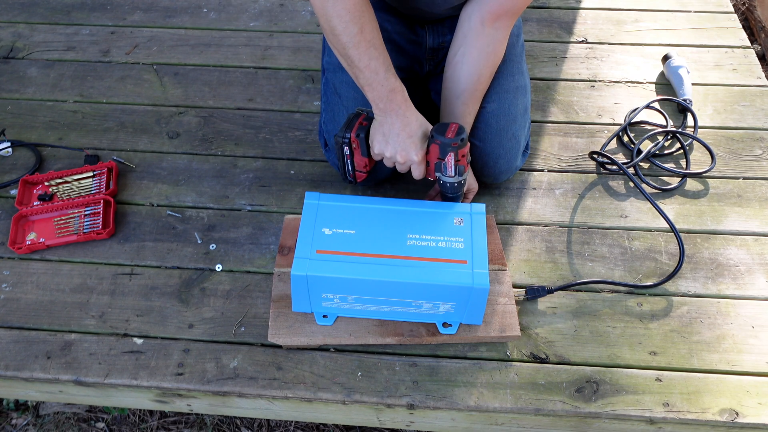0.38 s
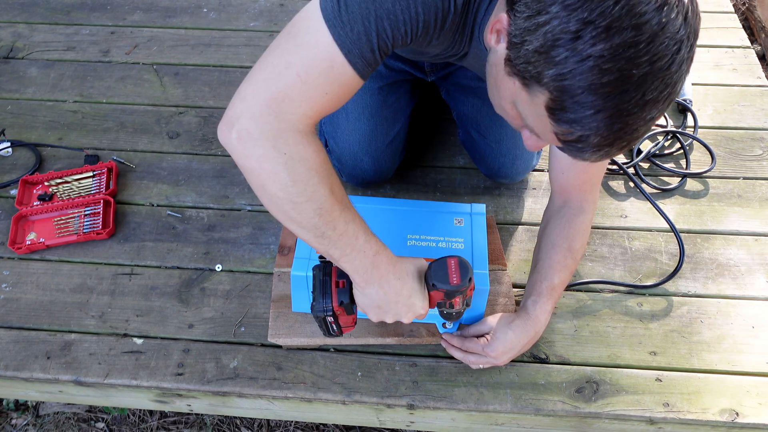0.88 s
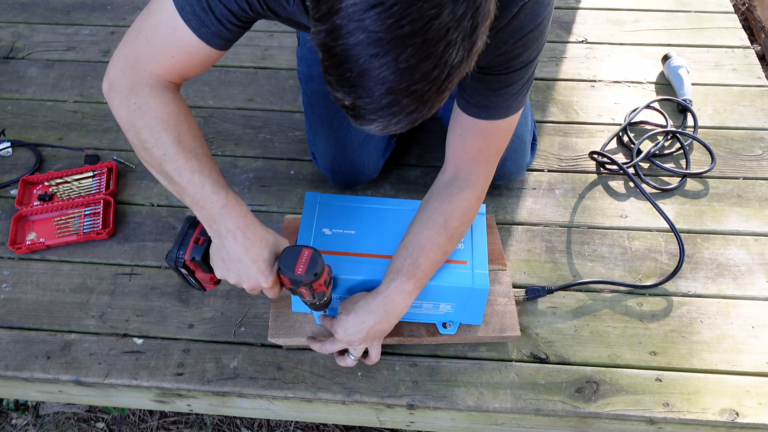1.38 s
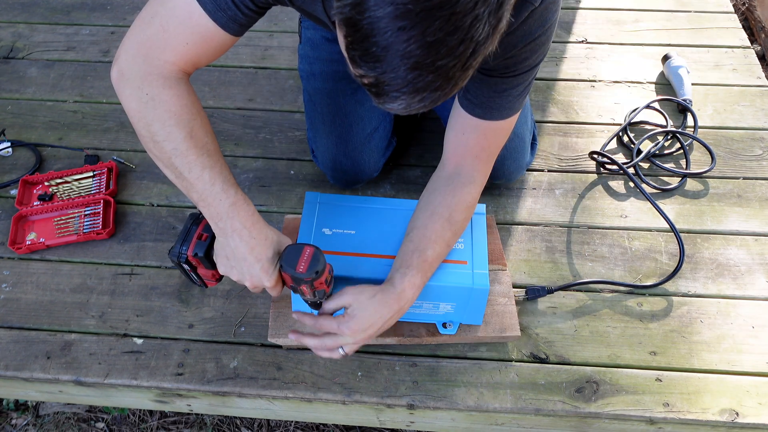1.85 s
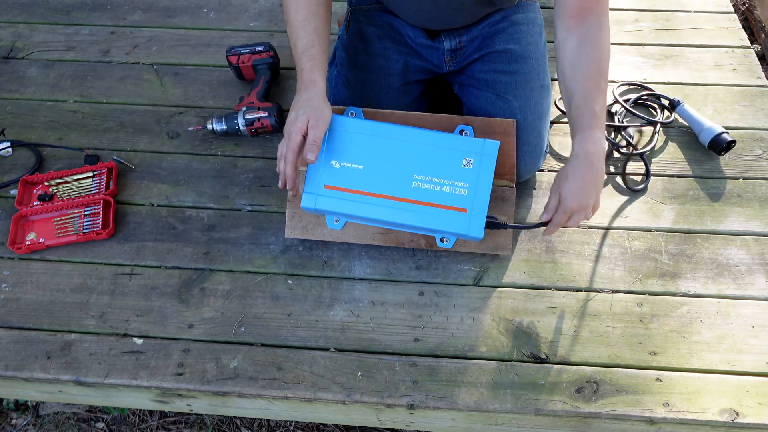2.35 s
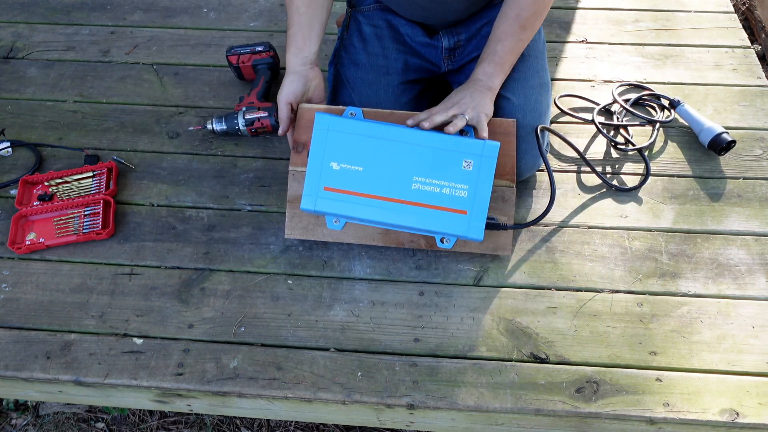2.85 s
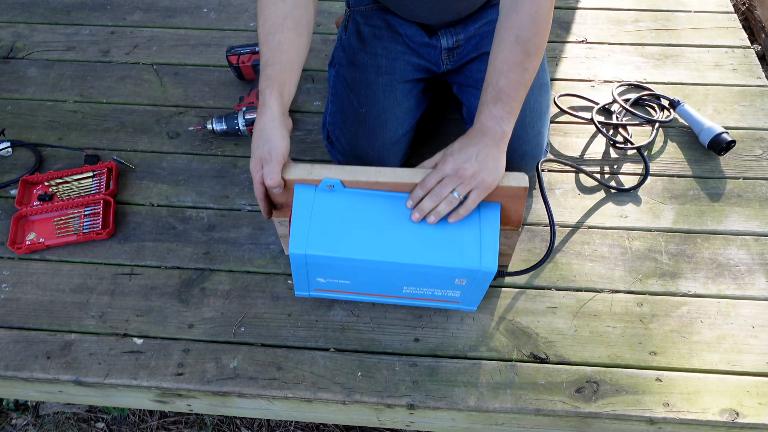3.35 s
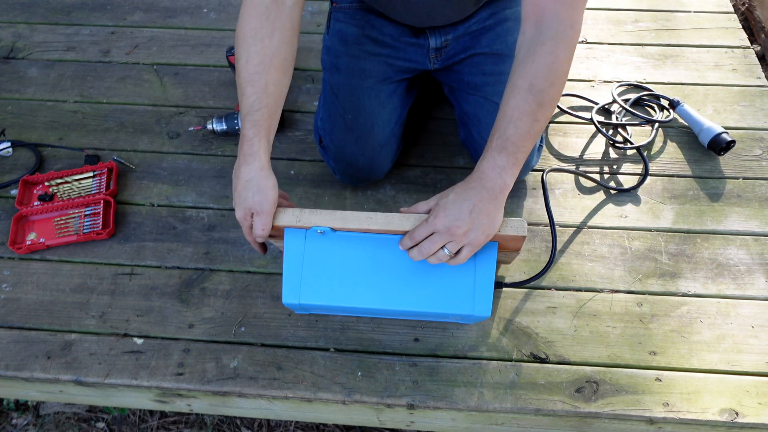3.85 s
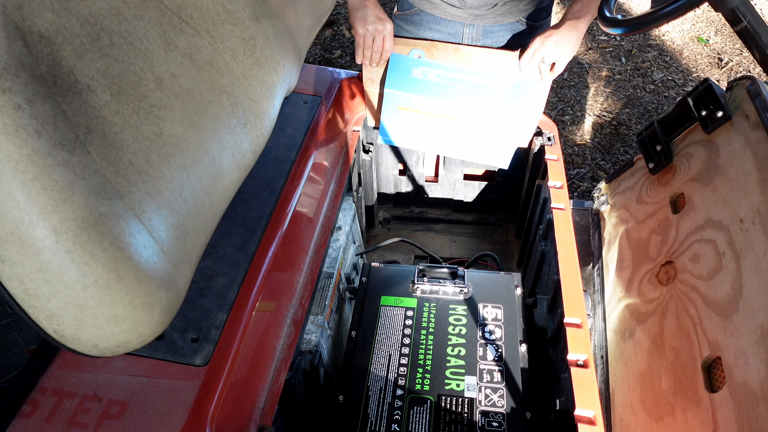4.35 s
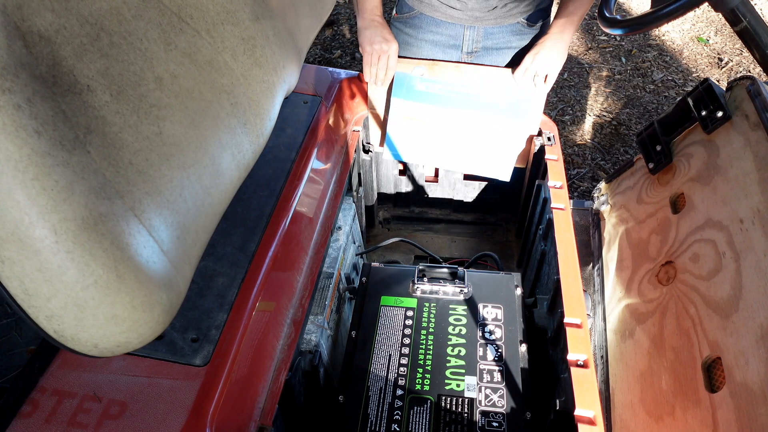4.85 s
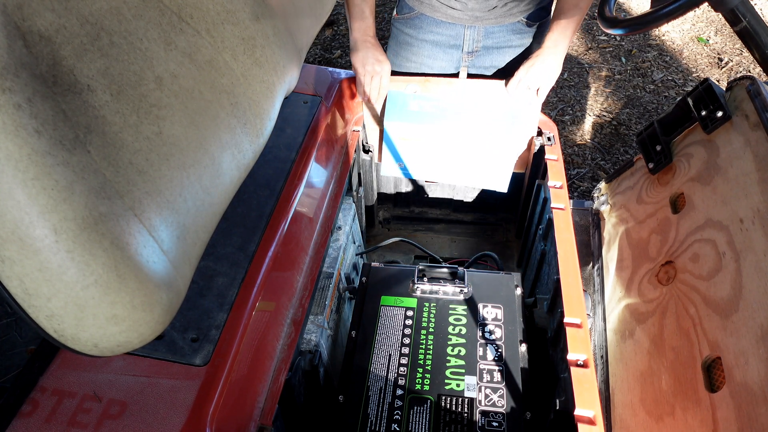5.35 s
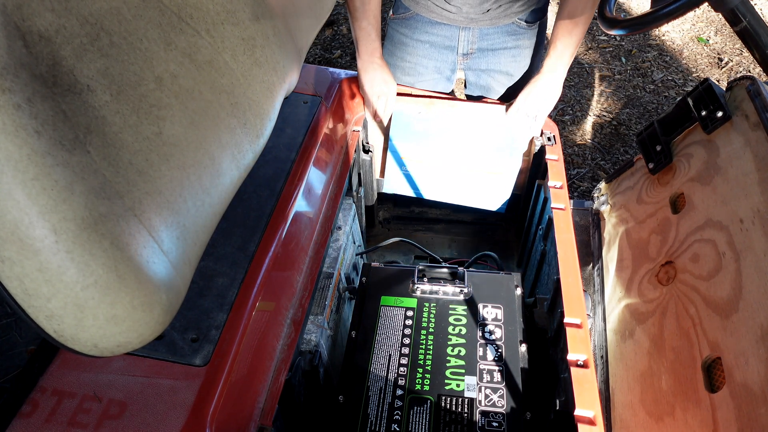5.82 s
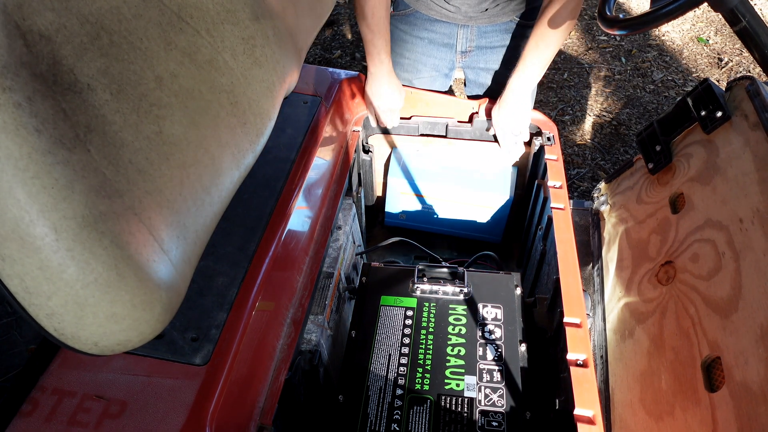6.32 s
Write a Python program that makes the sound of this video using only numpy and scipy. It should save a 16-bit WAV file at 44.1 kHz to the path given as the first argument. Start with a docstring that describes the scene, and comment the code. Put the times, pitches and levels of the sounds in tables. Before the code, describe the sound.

Outdoors on a wooden deck, a cordless drill runs twice back to back, its gear whine climbing each time, then gives two shorter, higher bursts with tiny trigger clicks between. It stops dead; soft knocks, brushing and low plank rumble follow as a board is tipped. Finally the board and case bump and scrape heavily into a hollow bay close to the single microphone, much louder, ending on strong thuds.

```python
"""A cordless drill drives four screws outdoors on a wooden deck, the sound of the first breaking off abruptly,
straight into the second: tones locked to the shaft, gears and switched motor current whine over gear rattle.
Then hands knock, drag and tip a board with a metal case on it, and lower it, bumping and scraping, into a
hollow bay close to the microphone. Blows are damped modes, drags are stick-slip noise through resonances, and
faint coloured noise is the open air."""
import sys
import numpy as np
from scipy import signal
from scipy.fft import rfft, irfft
from scipy.io import wavfile
from scipy.ndimage import uniform_filter1d

SR = 44100
rng = np.random.default_rng(int(sys.argv[2]) if len(sys.argv) > 2 else 0)


def voltage_ratio(level):
    """Linear amplitude factor for a level in decibels (scalar or array-like)."""
    return 10 ** (np.asarray(level, float) / 20)


def dump_mix(stems):
    """Bounce the given channels to the path in sys.argv[1] as a 16-bit WAV at rate SR."""
    frames = np.atleast_2d(stems).T  # one column per channel
    limited = np.clip(frames, -1, 1)  # hard clip at full scale
    pcm = np.round(limited * 32767).astype(np.int16)
    wavfile.write(sys.argv[1], SR, pcm)


N = 284709

# resonances of the hollow under the board: centre_hz, width_hz, relative_level_db
HOLLOW_MODES = [(150.7, 48, -3), (316, 183, 3.65), (516.2, 51, 7), (694, 125, 1)]
# resonances of rasping wood: centre_hz, width_hz, relative_level_db
RASP_MODES = [(800, 220, -1), (1100, 280, -1), (1450, 300, -4), (1900, 350, -9), (2300, 350, -16)]
# hiss spectra of rubbing, one on the deck and one in the bay: frequency_hz, relative_density_db (per Hz)
GRIT_SPECTRA = [
    [(1350, -22), (2300, -5), (3110, -4), (3790, -10.5), (4610, -13.5), (5160, -15), (6010, -19),
     (8060, -34), (14000, -59)],
    [(1350, 0.5), (2300, 4.5), (2450, -21), (2730, 2), (5660, -16.5), (8630, -23.5), (11900, -36),
     (14800, -44), (16000, -57.5)],
]
BAY_START_S = 4.1  # contacts after this are in the bay
HOUSING_HZ = 3320  # resonance of the drill housing
FREE_HZ = 971  # ring of the board's free part in scrapes and brushes


def evened(x):
    """Normalization: scales a signal to rms 1."""
    return x / np.sqrt(np.mean(x ** 2) + 1e-20)


def read(points, hz):
    """Interpolates a spectrum along a logarithmic frequency axis."""
    frequency, value = np.transpose(points)
    return np.interp(np.log(hz + 1), np.log(frequency + 1), value)


def add(mix, s, sound):
    """Superposition: sums a sound into the mix from time s."""
    part = mix[round(s * SR):][:len(sound)]
    part += sound[:len(part)]


def coloured(x, points):
    """Spectral shaping: weights each frequency of x by a curve, at rms 1."""
    hz = np.fft.rfftfreq(len(x), 1 / SR)
    return evened(irfft(rfft(x) * voltage_ratio(read(points, hz)), len(x)))


def resonate(x, hz, width):
    """Heterodyne resonator: a one-pole filter in a frame turning at hz, which may vary; gain 1 at the peak."""
    turn = np.exp(2j * np.pi * np.cumsum(hz * np.ones(len(x))) / SR)
    pole = np.exp(-np.pi * width / SR)
    return 2 * (turn * signal.lfilter([1 - pole], [1, -pole], x / turn + 1e-18)).real


def ringing(x, modes):
    """Modal superposition: x through parallel resonances, each two poles steep, at rms 1."""
    return evened(sum(voltage_ratio(db) * resonate(resonate(x, hz, width), hz, 2 * width) for hz, width, db in modes))


def lumpy(count, per_s, spread_db):
    """Random amplitude modulation: noise whose level wobbles at rates up to about per_s a second."""
    control_hz = 2000
    steps = rng.standard_normal(int(count / SR * control_hz) + 50)
    slips = evened(signal.lfilter(*signal.butter(2, min(per_s, 900), fs=control_hz), steps))
    wobble_db = spread_db * np.interp(np.arange(count) / SR * control_hz, np.arange(len(slips)), slips)
    return evened(rng.standard_normal(count) * voltage_ratio(wobble_db))


def patchy(x):
    """Time-frequency modulation: shifting contact lifts and dips patches about 500 Hz wide and 30 ms long."""
    z = signal.stft(x, nperseg=512, noverlap=384)[2]
    field = uniform_filter1d(rng.standard_normal(z.shape), size=6, axis=0)
    field = uniform_filter1d(field, size=10, axis=1)
    patch_db = 3 * evened(field) - 1.5
    return signal.istft(z * voltage_ratio(patch_db), nperseg=512, noverlap=384)[1][:len(x)]


def drill(pull):
    """Forced vibration: broadband gear rattle, shaft-order tones, and sidebands of the switched current."""
    # trigger pulls: start_s, release_s (where the first breaks off abruptly), rattle_db (relative), rise_s
    # (time constant), # stop_db_per_s
    pulls = [(.04, .654, -18.5, 0.025, 20004.5), (.656, 1.29, -17, 0.00041, 1103.5),
             (1.412, 1.668, -17, 0.0095, 419.5), (1.791, 2.026, -17.5, 0.0098, 416.5)]
    # shaft speed, one table a pull: time_s, speed_hz
    speeds = [
        [(0.035, 20), (0.05, 101), (0.08, 223), (0.13, 273), (0.21, 304), (0.29, 331), (0.37, 344), (0.45, 347),
         (0.61, 326), (0.655, 322)],
        [(0.657, 200), (0.77, 241), (0.85, 252), (0.88, 278), (0.91, 308), (0.95, 325), (1.01, 334),
         (1.09, 340), (1.2, 338), (1.3, 327)],
        [(1.405, 68), (1.435, 165), (1.47, 382), (1.5, 450), (1.55, 473), (1.6, 440), (1.625, 400), (1.66, 228),
         (1.72, 90)],
        [(1.785, 80), (1.81, 142), (1.83, 266), (1.86, 360), (1.89, 386), (1.93, 389), (1.995, 335),
         (2.015, 240), (2.03, 182), (2.08, 90)],
    ]
    # radiation of housing, bit and board, one spectrum a pull: frequency_hz, relative_density_db (per Hz)
    bodies = [
        [(47, -70), (80, -45), (163, -15.5), (271, -25.5), (338, 0), (550, -6.5), (1090, -5.5), (1280, -5),
         (1400, -3.5), (2270, -13.5), (3300, -7), (3700, -4.5), (4650, -6.5), (5000, -15), (7200, -15.5),
         (13100, -31.5), (15000, -38.5), (16000, -68)],
        [(47, -100.5), (80, -68), (242, -19), (289, -43), (331, -11.5), (441, -14.5), (482, -7), (538, -12),
         (672, -2.5), (1400, -2), (1860, -20), (2780, -2.5), (12800, -23.5), (14300, -26), (16000, -39.5)],
        [(47, -80), (80, -45), (208, -49.5), (323, -26.5), (441, 1), (504, -15.5), (1220, 1), (1670, -13.5),
         (2330, -14), (3390, -5.5), (4050, -11), (5770, -9), (6590, -22.5), (7700, -19.5), (16000, -34.5)],
        [(47, -81), (80, -46), (316, -21), (386, -6), (441, -14), (751, -9.5), (896, -5), (1340, -2),
         (2040, -19.5), (3100, -8), (3320, -12.5), (5770, -14.5), (13100, -32.5), (14300, -31), (16000, -49)],
    ]
    # shaft and gear orders: multiple of shaft speed, relative_level_db in pulls 1, 2, 3, 4,
    # loss_db per unit of slack, gain_db per unit of braking
    gear_orders = [(1, -30, -36, -31, -28, 60, -70), (2, -60, -29, -60, -32, 10, -40),
                   (3.23, -30, -60, -35, -36, 30, -30), (4.16, -25, -60, -39, -40, 70, 32),
                   (6, -31, -60, -60, -60, 70, -30), (8, -33, -29, -31, -32, 40, -20),
                   (12, -60, -37, -60, -60, 0, 0), (13, -34, -28, -37, -35, 16, 0),
                   (16.1, -60, -35, -36, -35, -2, 14)]
    # beats of switching with rotor: multiple of switching rate, multiple of shaft speed,
    # relative_level_db in pulls 1, 2, 3, 4
    sidebands = [(1, 0, -49, -50, -52, -50), (1, -2, -33, -70, -70, -70), (1, 2, -38, -70, -70, -70),
                 (1, -4, -52, -38, -44, -42), (1, 4, -43, -36, -48, -51), (1, -8, -70, -39, -70, -70),
                 (1, -16, -45, -70, -70, -70), (1, -20, -70, -42, -70, -70), (2, -2, -36, -70, -56, -60),
                 (2, -4, -54, -36, -56, -43)]
    # gear-mesh noise, one a pull: relative_level_db
    mesh_levels = [-10.5, -23.5, -39, -16.5]
    switch_hz = 7668

    start, release, rattle_db, rise, stop = pulls[pull]
    t = np.arange(start, release + 45 / stop, 1 / SR)
    running = (1 - np.exp(-(t - start) / rise)) * voltage_ratio(-stop * np.maximum(t - release, 0))

    speed = uniform_filter1d(np.interp(t, *np.transpose(speeds[pull])), size=600)
    fastest = np.maximum.accumulate(speed)
    slack = 1 - fastest / speed.max()  # how far the run-up has still to go
    braking = np.minimum(1 - speed / fastest, .45)  # share of the speed lost
    speed = speed * (1 + .02 * uniform_filter1d(rng.standard_normal(len(t)), size=300))  # load jitters it
    turn = 2 * np.pi * np.cumsum(speed) / SR

    once_a_turn = 1 + 0.069 * np.cos(turn)  # one firmer knock a turn
    rattle = coloured(lumpy(len(t), 280, 2.1) * once_a_turn, bodies[pull])
    low = signal.sosfilt(signal.butter(2, 1800, fs=SR, output="sos"), rattle)
    rattle = low + (rattle - low) * running ** 1.2  # the treble dies first as the motor stops
    mesh = ringing(rng.standard_normal(len(t)), [(12.2 * speed, 700, 0)])
    noise = voltage_ratio(rattle_db) * running * (0.94 * rattle + voltage_ratio(mesh_levels[pull]) * mesh)

    gears = np.zeros(len(t))
    for row in gear_orders:
        level_db = row[1 + pull] - row[5] * slack + row[6] * braking
        gears += voltage_ratio(level_db) * np.cos(row[0] * turn + 2 * np.pi * rng.random())
    whine = np.zeros(len(t))
    for row in sidebands:
        whine += voltage_ratio(row[2 + pull]) * np.cos(row[0] * 2 * np.pi * switch_hz * t + row[1] * turn)
    whine *= voltage_ratio(np.minimum(16 * slack, 9))  # louder while the shaft runs up
    driven = np.sqrt(2) * np.minimum(1.2 * running, 1) ** 4  # tones stop with the current
    tones = driven * (voltage_ratio(1.5) * gears + running ** 2 * whine)
    # tones swell as they cross the housing resonance
    tones = tones + 2.2 * resonate(resonate(tones, HOUSING_HZ, 700), HOUSING_HZ, 700)
    return t[0], (noise + tones) * signal.windows.tukey(len(t), .012)


def bite(s, db):
    """Transient excitation: the housing resonance shudders in a bell-shaped burst as the motor first bites."""
    t = np.arange(0, .07, 1 / SR)
    shudder = resonate(resonate(rng.standard_normal(len(t)), HOUSING_HZ, 450), HOUSING_HZ, 450)
    return s - .01, voltage_ratio(db) * evened(shudder) * np.exp(-((t - .02) / .013) ** 2)


def tick(s, db):
    """Impulse response: a tiny plastic snap of the trigger switch, as quickly damped high modes."""
    t = np.arange(0, .03, 1 / SR)
    snap = ringing(rng.standard_normal(len(t)), [(5830, 970, -0.75), (6600, 620, -2), (8050, 500, -2.2)])
    return s, voltage_ratio(db - 3) * snap * voltage_ratio(-60 * t / .035) * (1 - np.exp(-t / .001))


def squeak(start, end, hz, db):
    """Narrow-band resonance: the bit sings against the screw head in a thin, fuzzy whistle."""
    noise = rng.standard_normal(round((end - start) * SR))
    return start, voltage_ratio(db) * ringing(noise, [(hz, 90, 0)]) * signal.windows.tukey(len(noise), .5)


def knock(s, db, hz, t60, crack_db):
    """Modal impact: a damped swing, a smear of wooden modes, a short crack, and the hollow's decay."""
    # wooden modes: multiple of the strongest ring, relative_level_db, multiple of the blow's decay time
    wood_modes = [(.32, -19.5, 2.14), (1.001, 4.5, 1.03), (1.829, -5, 1.11), (2.9, -6.5, 0.42),
                  (3.9, -14.5, 0.44), (5.298, -24, 0.3)]
    t = np.arange(0, .3, 1 / SR)
    shake, crack, air = rng.standard_normal((3, len(t)))
    swing = np.sin(2 * np.pi * hz * t) * voltage_ratio(-60 * t / (.6 * t60))
    swing += 0.65 * np.sin(np.pi * hz * t) * voltage_ratio(-60 * t / (0.37 * t60))  # the first low push
    soft_db = .2 * min(crack_db + 15, 0)  # a soft blow hardly reaches the upper modes

    hollow = ringing(air, HOLLOW_MODES) + voltage_ratio(1.5 * soft_db) * ringing(air, RASP_MODES[:2])
    hollow *= voltage_ratio(-17 - 60 * t / 0.27)  # lingers with a 60 dB decay of 0.27 s
    smear = np.zeros(len(t))
    for multiple, mode_db, share in wood_modes:
        level_db = mode_db - 4 + soft_db * max(multiple - 1, 0) - 60 * t / (t60 * share)
        smear += voltage_ratio(level_db) * ringing(shake, [(hz * multiple, 0.17 * hz + 40, 0)])
    crack = coloured(crack, GRIT_SPECTRA[int(s > BAY_START_S)])
    crack *= voltage_ratio(crack_db - 8.5 - 60 * t / (0.5 * t60))
    onset = 1 - np.exp(-(t / 0.00066) ** 2)
    return s, voltage_ratio(db) * 0.83 * (swing + smear + crack + hollow) * onset


def rub(t, boom_db, rasp_db, grit_db, free_hz):
    """Stick-slip friction: slips shake the hollow and the board's modes, and grit hisses on top."""
    in_bay = t[0] > BAY_START_S
    slips, grains = lumpy(len(t), 52, 2.4), lumpy(len(t), 160, 1.6)
    rasp = ringing(slips + 0.41 * grains, RASP_MODES) + 0.82 * ringing(grains, [(free_hz, 160, 0)])
    grit = coloured(grains + 2.7 * slips, GRIT_SPECTRA[int(in_bay)])
    low = signal.sosfiltfilt(signal.butter(2, 5000, fs=SR, output="sos"), grit)
    treble_db = .4 * (grit_db + 29) * in_bay  # in the bay light grit is dull
    grit = low + (grit - low) * voltage_ratio(treble_db)
    surface = patchy(voltage_ratio(rasp_db) * evened(rasp) + voltage_ratio(grit_db) * grit)
    sound = voltage_ratio(boom_db) * ringing(slips, HOLLOW_MODES) + surface
    edge_s = np.minimum(t - t[0], t[-1] - t)
    return t[0], sound * np.sqrt(np.clip(edge_s / .004, 0, 1))


def scrape(s, rise, hold, boom_db, grit_db):
    """Friction under load: as pressure builds, sags and lets go, grit rises less and falls more than boom."""
    t = np.arange(s - rise, s + hold + .16, 1 / SR)
    up_db = -20.5 * np.maximum(s - t, 0) / rise
    sag_db = -13 * np.maximum(t - s, 0)  # 13 dB per s
    release_db = -212.5 * np.maximum(t - s - hold, 0)  # 212.5 dB per s
    down_db = sag_db + release_db
    boom_db = boom_db + up_db + down_db
    return rub(t, boom_db, boom_db - 4, grit_db + 0.75 * up_db + 3.5 * down_db, FREE_HZ)


def slide(start, end, first_db, last_db, grit_db, free_hz):
    """Length-dependent resonance: in a light slide the free part shortens and its ring climbs to free_hz."""
    t = np.arange(start, end, 1 / SR)
    rasp_db = np.linspace(first_db, last_db, len(t))
    climb = np.linspace(1 - 0.092, 1, len(t))
    return rub(t, rasp_db - 4, rasp_db, rasp_db + grit_db, free_hz * climb)


def brush(start, length, rasp_db, grit_db):
    """Light friction: a soft stroke over the deck swells early, trails off and rings unevenly."""
    # what rings under a brushing hand: centre_hz, width_hz, relative_level_db
    skin_modes = [(960, 50, -4), (1700, 130, -3), (2086, 29, -5), (2470, 39, -5), (3200, 240, -9),
                  (4760, 52, -10)]
    t = np.arange(start, start + length, 1 / SR)
    s, sound = rub(t, rasp_db - 4.5, rasp_db, grit_db - 2.5, FREE_HZ)
    sound = sound + voltage_ratio(grit_db - 4.0) * ringing(lumpy(len(t), 45, 6.4), skin_modes)
    return s, sound * np.sin(np.pi * ((t - start) / length) ** 0.77)


def rustle(start, length, db):
    """Band-shaped noise: a brief high hiss that starts quickly and thins out."""
    # hiss spectrum: frequency_hz, relative_density_db (per Hz)
    hiss_spectrum = [(6000, -21), (8500, 3), (11000, 1.5), (15000, -8.5)]
    noise = patchy(coloured(lumpy(round(length * SR), 40, 2.2), hiss_spectrum))
    return start, voltage_ratio(db) * noise * np.sin(np.pi * np.linspace(0, 1, len(noise)) ** .55)


def rumble():
    """Low modal vibration: throbs over a faint steady creep swing the plank modes, their pitch wavering."""
    # plank modes: centre_hz, width_hz (also rms pitch waver), relative_level_db
    plank_modes = [(62, 5.9, -22), (117.5, 15, -7), (206, 9.6, -8)]
    # soft throbs as weight shifts: time_s, level_db
    throbs = [(2.15, -37.5), (2.25, -41.5), (2.3, -46), (2.42, -45), (2.6, -41.5), (2.668, -44),
              (2.77, -48), (2.85, -49), (2.92, -42.5), (3.026, -47.5), (3.09, -53), (3.136, -46.5),
              (3.22, -49), (3.3, -44), (3.38, -62)]
    t = np.arange(2.12, 3.6, 1 / SR)
    push = voltage_ratio(-57) + sum(voltage_ratio(db) * np.exp(-((t - s) / 0.035) ** 2) for s, db in throbs)
    modes = np.zeros(len(t))
    for hz, width, db in plank_modes:
        waver = evened(uniform_filter1d(rng.standard_normal(len(t)), size=2000))
        modes += voltage_ratio(db) * np.sin(2 * np.pi * np.cumsum(hz + width * waver) / SR)
    planks = evened(modes) + 0.47 * ringing(lumpy(len(t), 25, 1.0), plank_modes)
    return t[0], push * evened(planks) * signal.windows.tukey(len(t), .04)


def deck(x):
    """Sparse reflections: convolution with random early echoes and a short open-air tail."""
    t = np.arange(0, .25, 1 / SR)
    struck = rng.random(len(t)) < 2000 / SR  # about 2000 echoes a second
    taps = rng.standard_normal(len(t)) * struck * voltage_ratio(-60 * t / 0.034) * (t > .003)
    return signal.oaconvolve(x, taps / np.linalg.norm(taps))[:N]


def open_air():
    """Stationary random noise: a faint, mostly low background."""
    # air spectrum: frequency_hz, relative_density_db (per Hz)
    air_spectrum = [(18, -55.5), (30, -31), (114, -16.5), (152, -14), (229, -7.5), (267, -14), (674, -15),
                    (1190, -18.5), (1490, -24.5), (2440, -27), (14000, -52), (16000, -62)]
    return voltage_ratio(-53.5) * coloured(rng.standard_normal(N), air_spectrum)


def scene():
    """Linear superposition: all sources in one spot, heard by a single microphone."""
    # first bites of the motor: time_s (the shudder peaks 10 ms later), level_db
    bites = [(0.048, -25), (1.419, -16), (1.796, -15.5)]
    # trigger switch ticks: time_s, level_db (relative)
    ticks = [(0.033, -32), (1.3633, -32.5), (1.406, -31), (1.7215, -37.5), (1.7404, -39.5)]
    # the bit singing between pulls: start_s, end_s, pitch_hz, level_db
    squeaks = [(1.71, 1.812, 1990, -40.5), (2.041, 2.13, 1950, -53.5)]
    # blows: time_s, level_db (relative), strongest ring pitch_hz, decay_s (scales all but the hollow), crack_db (relative)
    knocks = [(2.187, -24.5, 533.4, 0.11, -18), (2.473, -25, 860, 0.075, -6), (2.879, -30, 544, 0.163, 0),
              (2.901, -33, 910, 0.14, -43), (3.64, -11.5, 434, 0.2, -14), (3.694, -19, 447, 0.12, -42),
              (3.994, -53.5, 1220, 0.14, 21), (4.116, -15, 380, 0.081, -80), (4.235, -25.5, 958, 0.17, -84),
              (4.361, -7, 285, 0.22, -13.5), (4.395, -11.5, 418, 0.11, 1), (4.454, -2.5, 538, 0.13, -5.5),
              (4.518, -17, 181, 0.13, -2), (4.636, -5, 412, 0.166, -14), (4.692, -8.5, 408, 0.16, -25),
              (5.077, -33, 408, 0.44, -30), (5.425, -5, 318.5, 0.33, -24.5),
              (5.682, -26.5, 1110, 0.35, -39), (5.81, -21, 735, 0.3, 4), (5.844, -12, 575, 0.23, -21),
              (5.91, -18, 330, 0.042, -35), (6.129, -5.5, 290, 0.146, -0.5), (6.254, 2, 832, 0.071, -45.5),
              (6.272, -6, 275, 0.18, -48), (6.344, -2.5, 363, 0.19, -3)]
    # heavy scrapes of the case down the bay wall: full_pressure_s, rise_s, hold_s, boom_db, grit_db
    scrapes = [(4.645, .012, 0.1, -18, -21.5), (4.876, .09, 0.054, -12, -31.5),
               (5.419, .015, 0.14, -13.5, -19.5), (5.841, .035, 0.018, -15.5, -22),
               (6.122, .07, .11, -10.5, -16.5), (6.275, .02, 0.063, -11, -22)]
    # light slides of the board: start_s, end_s, first_rasp_db, last_rasp_db, grit_db (over the rasp), free_ring_hz
    slides = [(4.508, 4.649, -47.5, -36.5, 9, 1500), (4.752, 4.862, -49.5, -52, -20, 1080),
              (5.04, 5.277, -46, -35.5, -16, 1320), (5.25, 5.423, -33.5, -25.5, -7, 1380),
              (5.619, 5.84, -39, -31.5, -19, 1040), (5.899, 6.099, -32.5, -20.5, -4.5, 955)]
    # hands and board brushing over the deck: start_s, length_s, rasp_db, grit_db (relative)
    brushes = [(2.882, 0.0483, -43, -45), (3.14, 0.22, -45.5, -43.5), (3.42, 0.19, -50, -56.5),
               (3.962, 0.13, -54, -53)]
    # high rustles: start_s, length_s, level_db
    rustles = [(4.129, 0.22, -61.5), (4.398, .03, -40), (4.795, 0.02, -53.5), (5.532, .03, -44),
               (5.72, .1, -57), (6.05, .23, -40.5), (6.415, .035, -56)]

    mix = np.zeros(N)
    for pull in range(4):
        add(mix, *drill(pull))
    for source, rows in ((bite, bites), (tick, ticks), (squeak, squeaks), (knock, knocks),
                         (scrape, scrapes), (slide, slides), (brush, brushes), (rustle, rustles)):
        for row in rows:
            add(mix, *source(*row))
    add(mix, *rumble())
    mix = mix + voltage_ratio(-17) * deck(mix)
    mix = mix + open_air()
    return np.array([mix, mix])


def roll_off(x):
    """The treble ends steeply here."""
    return signal.sosfilt(signal.butter(12, 17010, fs=SR, output="sos"), x)


def record(dry):
    """Band limiting and saturation: bass and extreme treble are cut and loud peaks bend softly."""
    cut = signal.sosfilt(signal.butter(4, 70, "high", fs=SR, output="sos"), dry)
    cut = signal.sosfilt(signal.butter(8, 15800, fs=SR, output="sos"), cut)
    overloaded = 1.153 * np.tanh(cut / 1.355)
    return roll_off(np.clip(overloaded, -1, 1))


dry = scene()
out = record(dry)
dump_mix(out)
```